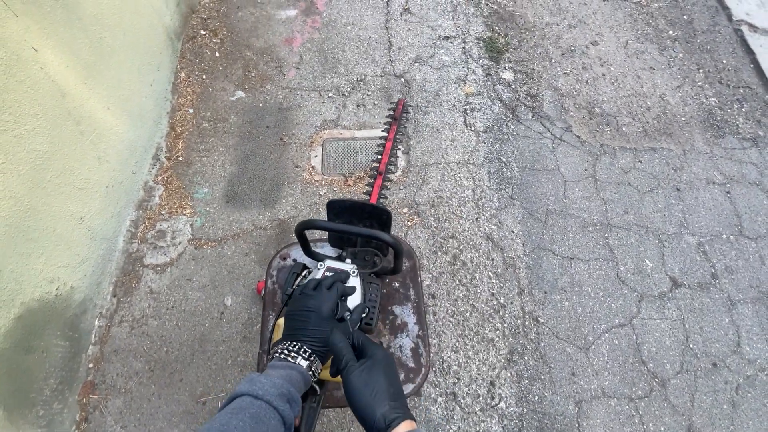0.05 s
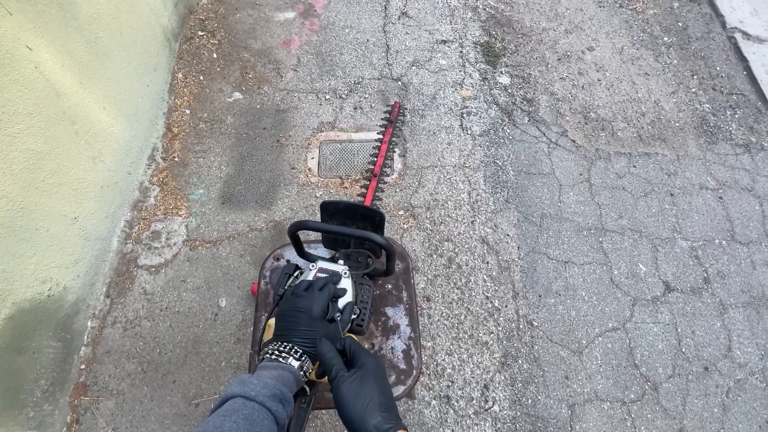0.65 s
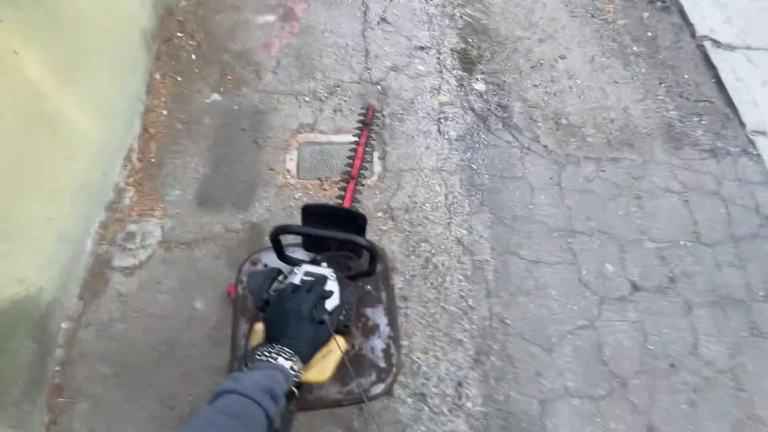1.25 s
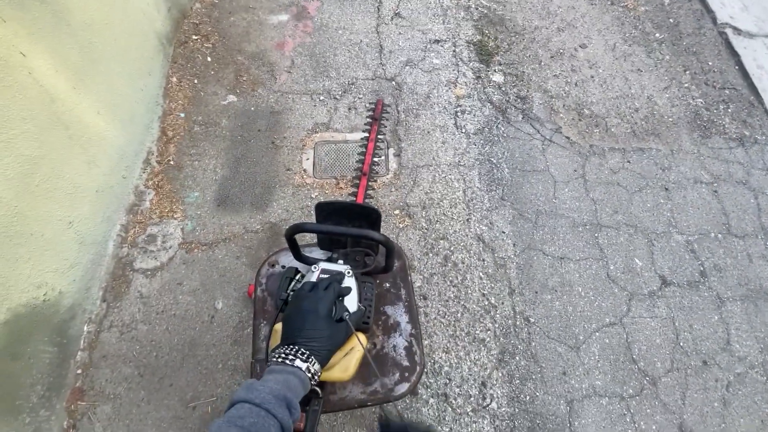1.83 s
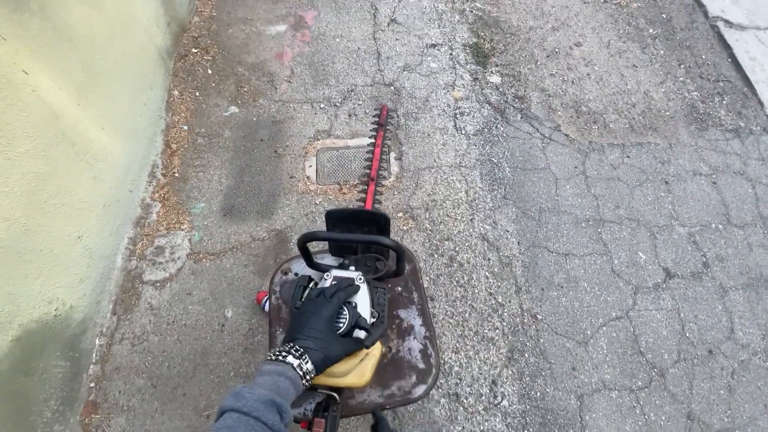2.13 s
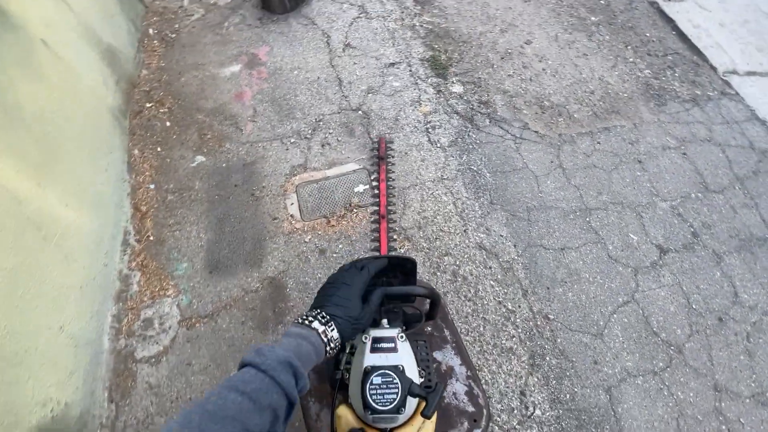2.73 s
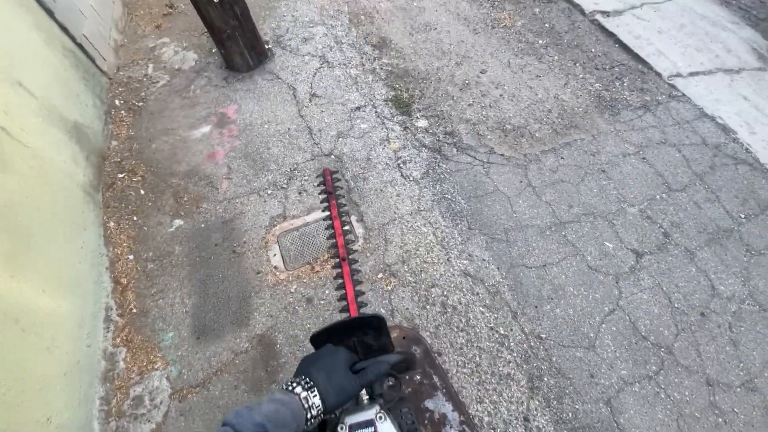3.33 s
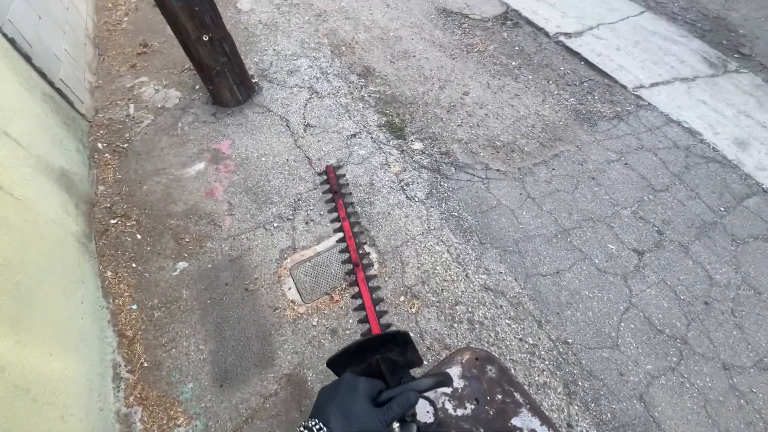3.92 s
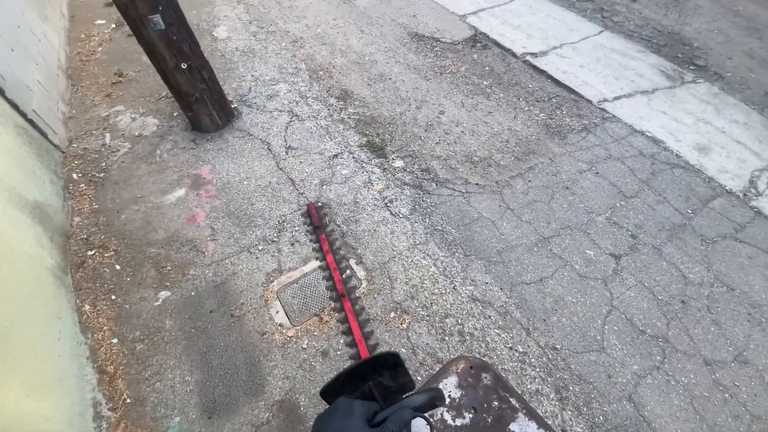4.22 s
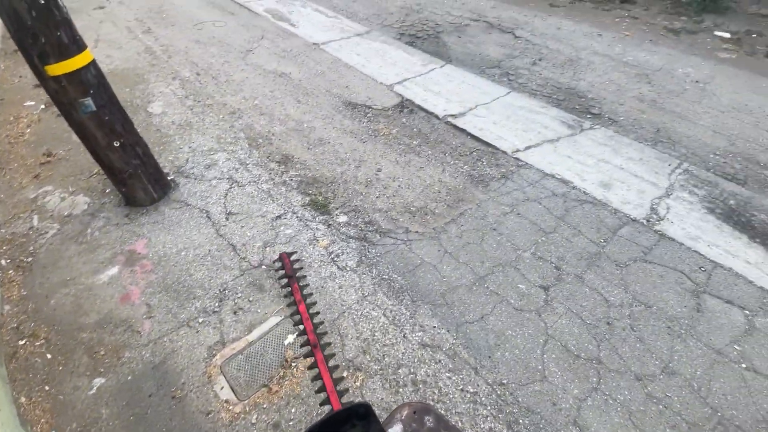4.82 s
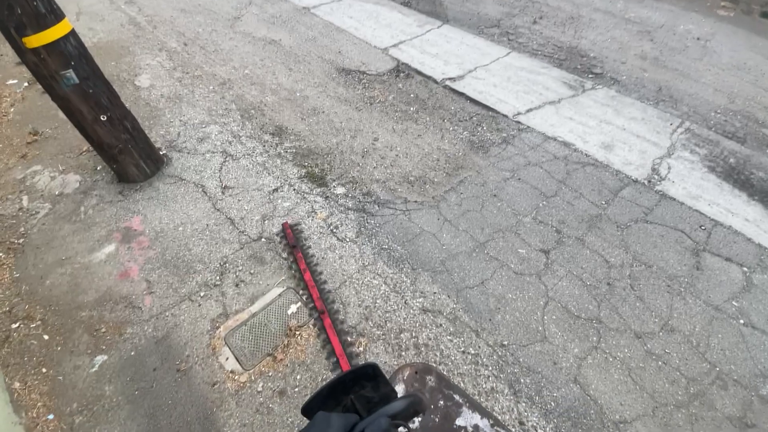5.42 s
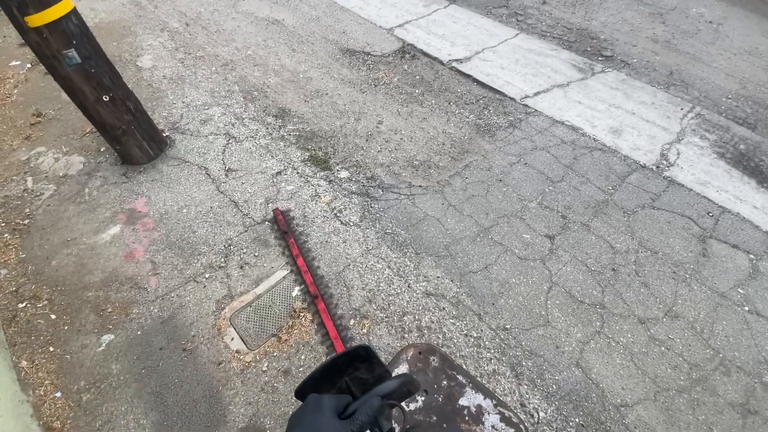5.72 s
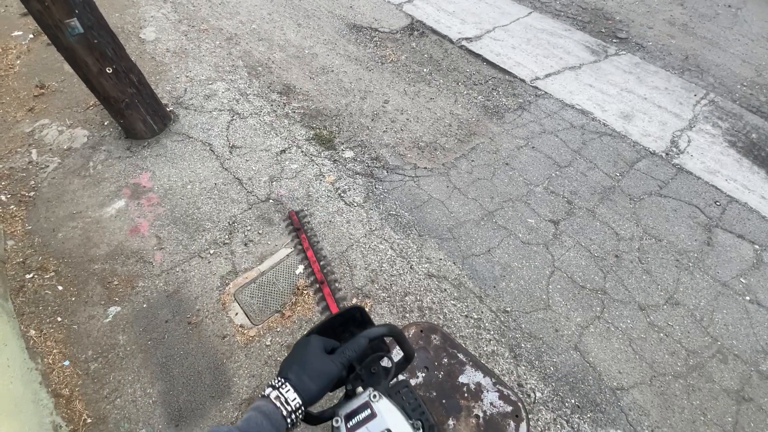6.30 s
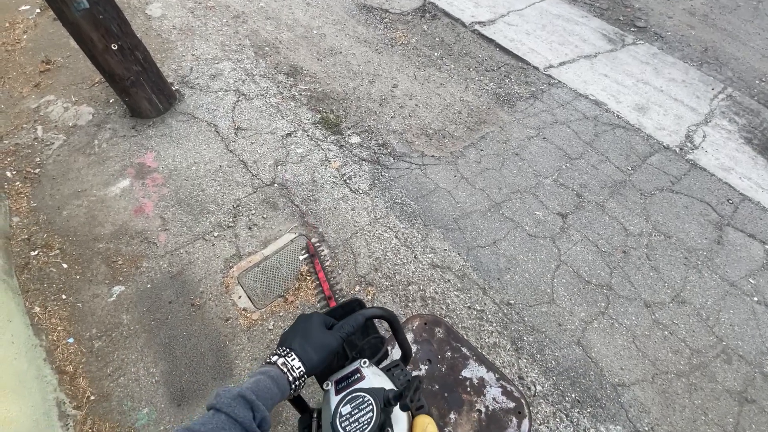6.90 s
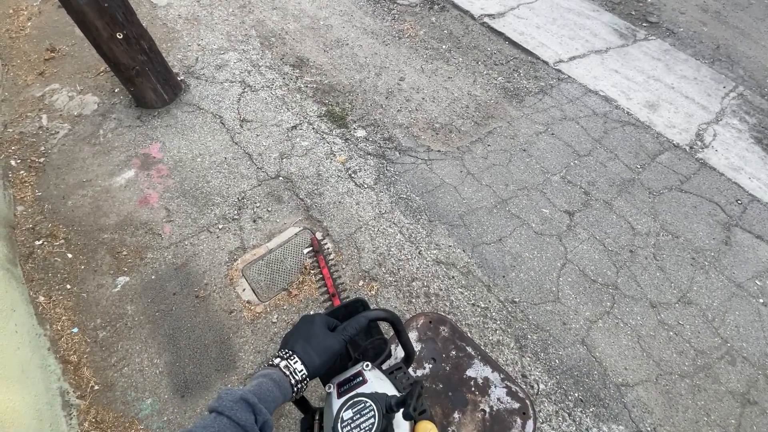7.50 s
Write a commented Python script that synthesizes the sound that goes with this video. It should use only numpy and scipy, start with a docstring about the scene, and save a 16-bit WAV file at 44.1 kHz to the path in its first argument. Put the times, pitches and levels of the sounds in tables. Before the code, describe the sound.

Close by on a paved street, a small petrol hedge trimmer starts with one whirring, clicking pull of its cord. The engine sputters into a ragged, knocking idle. Two quick, loud revs follow, then a brief drop and two longer revs with a raspy drone and metallic blade chatter, each breaking into a coarse burble at high speed. The street itself is only a faint low hum.

```python
"""A two-stroke hedge trimmer is pull-started, catches, putters unevenly and is revved four times.
Near the top of the last two revs it fires hard only every other turn (four-stroking).
The crank times the airbox puffs, muffler drone and bark, housing rasp and blade clatter.
Lone firings knock at idle; the starter cord whirrs, clicks and thuds. A faint street hum lies behind,
and all is heard through two microphone ports with short reflections off pavement and wall."""
import sys
import numpy as np
from scipy import signal
from scipy.fft import rfft, irfft, next_fast_len
from scipy.io import wavfile
from scipy.ndimage import uniform_filter1d, map_coordinates

SR = 44100
rng = np.random.default_rng(int(sys.argv[2]) if len(sys.argv) > 2 else 0)


def store_pcm(level_fs):
    """Save levels as 16-bit WAV."""
    pcm = np.round(np.clip(level_fs, -1, 1) * 32767).astype(np.int16)
    wavfile.write(sys.argv[1], SR, np.atleast_2d(pcm).T)


N = 332955
T = np.arange(N) / SR

# Each row: throttle opens in s, shuts in s, target crank speed in Hz, spin-up time in s.
REVS = [(3.595, 3.928, 144.0, .464), (4.109, 4.546, 143.8, .424), (5.079, 6.377, 153.0, .511),
        (6.625, 7.7, 146.5, .452)]
# Four-stroking. Each row: time in s, weakening of every second firing from 0 to 1.
FOUR_STROKING = [(5.72, 0), (5.77, .6), (6.36, .6), (6.42, 0), (7.07, 0), (7.12, .55), (7.55, .45)]
# The trimmer is swung about. Each row: time in s, then muffler, housing and blade gain in dB.
SWING_GAINS = [(3.4, -1, 1.5, 2), (3.76, 1, 3, 4.5), (4.45, 0, .5, 1.5), (4.9, -4.5, -3, -2.5),
               (5.25, -2, -1, -1), (5.7, -0.5, 1.5, 2.5), (6.0, -3.5, -0.5, 2), (6.25, -3.5, 1.5, -0.5),
               (6.75, -4, 1, -1), (7.55, -4, 1, 0.5)]
# Each row: frequency in Hz, housing response in dB.
HOUSING_BODY = [(850, -48.5), (1150, 9.5), (1280, 15.5), (1450, 17), (1650, 15), (1850, 16.5), (2000, 15.5),
                (2200, 7.5), (2450, -10), (3600, -20)]


def engine(turns, speed_hz):
    """Each turn puffs through the airbox, barks in the muffler, shakes the housing, rattles the blades."""
    # Open throttle. Each row: crank speed in Hz, then puff, bark, rasp and clatter level in dB.
    effort = [(48.3, -26.5, -28, -35.5, -38), (76.4, -27, -23.5, -26, -27.5),
              (108, -26.5, -22.5, -22.5, -24), (115, -31, -21.5, -20.5, -23.5),
              (124, -36, -22.5, -22, -23.5)]
    # Change of those four levels with the throttle shut, in dB.
    shut_db = [-2.5, -12, -5, -2.5]
    # In the first seconds the low band is almost silent, then swells in. Each row: time in s, then offsets of
    # those four levels in dB.
    opening_offsets = [(1.38, -24, -13, -11.5, -3.5), (1.86, -66, -15, -7, -4), (2.25, -35.5, -5.5, -4, -4),
                       (2.52, -10, 7.5, -3.5, -1), (2.7, 0, 4, 0.5, 1), (3.05, 1.5, 3, -3.5, -2.5)]
    puff_db, bark_db, rasp_db, clatter_db = levels(effort, shut_db, speed_hz) + curves(opening_offsets)
    muffler_db, housing_db, blades_db = curves(SWING_GAINS)
    skip, = curves(FOUR_STROKING)
    rough = sputter(speed_hz)
    count = np.arange(np.ceil(turns[0]), turns[-1])
    turn_s, odd = np.interp(count, turns, T), count % 2
    ragged = np.interp(turn_s, T, rough)
    puff = amp(puff_db + muffler_db) * airbox_puff(turn_s, ragged)
    blow_s = jitter(turn_s, .0004 * ragged)
    slap_s = np.interp(count + .62, turns, T)
    sizes = (1 - odd * np.interp(turn_s, T, skip)) * scatter(turn_s, 1 + 1.2 * ragged)
    # Sputter and weak firings turn clean harmonics into rushing gas.
    gas_share = np.clip(.27 + .62 * rough + .3 * skip, 0, 1)
    bark = amp(bark_db + muffler_db) * muffler_bark(blow_s, sizes, gas_share)
    rasp = amp(rasp_db + housing_db) * housing_rasp(blow_s, slap_s, sizes, gas_share)
    clatter = amp(clatter_db + blades_db) * blade_clatter(turns, turn_s, odd, ragged)
    air = amp(clatter_db - 15.5) * cooling_fan()
    running = np.interp(T, [1.3, 1.4], [0, 1])
    return running * (puff + bark + rasp + clatter + air)


def airbox_puff(turn_s, ragged):
    """Each stroke rings the airbox with a pulse and a breath of noise."""
    # Each row: frequency in Hz, response in dB.
    airbox = [(25, -92), (60, -32), (110, -15), (150, -12), (200, 7.5), (270, 1.5), (350, -4.5), (430, 1.5),
              (520, -17), (750, -49.5)]
    stroke_s = jitter(turn_s, .0007 * ragged)
    tone = ring(pulses(stroke_s, scatter(turn_s, 1 + 1.02 * ragged)), airbox)
    breath = ring(bursts(stroke_s, scatter(turn_s, spread_db=2.5), t60_s=.02, rise_s=.002), airbox)
    return steady(steady(tone) + .3 * steady(breath))


def muffler_bark(blow_s, sizes, gas_share):
    """The exhaust port opens just after each blow and vents into the muffler."""
    # Each row: frequency in Hz, response in dB.
    muffler = [(330, -82), (480, 0), (560, -11), (650, 2.5), (730, 13.5), (800, 5.5), (900, 10.5),
               (1020, 4), (1150, 3), (1500, -42)]
    vent_s, strength = blow_s + .0028, sizes ** .6
    tone = ring(pulses(vent_s, strength), muffler)
    gas = ring(bursts(vent_s, strength, t60_s=.06, rise_s=.001), muffler)
    return blend(tone, gas, .85 * gas_share ** 1.7)


def muffler_drone(turns, speed_hz):
    """Crank orders 1-3 from the first rev on, plus half orders while four-stroking."""
    # Open throttle. Each row: crank speed in Hz, then level of orders 1, 2 and 3 in dB.
    orders = [(52, -45, -48, -24.5), (71.7, -40, -39, -25.5), (84.5, -48, -28.5, -25.5),
              (104, -43, -49, -23), (110, -29, -42, -24.5), (123.3, -26, -31.5, -22),
              (131.6, -24.5, -26, -23.5)]
    # Change of those three levels with the throttle shut, in dB.
    shut_db = [-12, 2, -40]
    # Each row: crank order, level in dB re order 2 at full four-stroking.
    half_orders = [(.5, -18), (1.5, -1), (2.5, -11), (3.5, -8), (4.5, -20)]
    first_db, second_db, third_db = levels(orders, shut_db, speed_hz)
    muffler_db, _, _ = curves(SWING_GAINS)
    skip, = curves(FOUR_STROKING)
    rough = sputter(speed_hz)
    order = lambda k: np.sqrt(2) * np.cos(2 * np.pi * k * turns + .2 * rough * wobble(60))
    tone = sum(amp(db + (.5 + 1.5 * rough) * wobble(45)) * order(k)
               for k, db in enumerate([first_db, second_db, third_db + muffler_db], 1))
    halves = sum(amp(db + .8 * wobble(14)) * order(k) for k, db in half_orders)
    return (tone + skip * amp(second_db) * halves) * np.interp(T, [3.57, 3.62], [0, 1])


def housing_rasp(blow_s, slap_s, sizes, gas_share):
    """Each blow shakes the housing; the piston slaps it again later in the turn."""
    tone = ring(pulses(blow_s, sizes) + .55 * pulses(slap_s, sizes), HOUSING_BODY)
    gas = ring(bursts(blow_s, sizes, t60_s=.06, rise_s=.001), HOUSING_BODY)
    gas = filtered(gas, lambda hz: 1 / (1 + ((hz - 1520) / 300) ** 2))
    return blend(tone, gas, gas_share ** .9)


def blade_clatter(turns, turn_s, odd, ragged):
    """The geared blades reverse every second turn; loose parts chatter in between."""
    clack_s = jitter(turn_s, .001 * ragged)
    sizes = (1 - .55 * odd) * scatter(turn_s, spread_db=2.5)
    clacks = bursts(clack_s, sizes, t60_s=.02, rise_s=.0008)
    loose_s = np.interp(rng.uniform(0, turns[-1], 3 * len(turn_s)), turns, T)
    chatter = bursts(loose_s, scatter(loose_s, spread_db=4), t60_s=.008)
    drive = steady(clacks) + .8 * steady(chatter) + .6 * rng.standard_normal(N)
    return steady(blade_steel(drive, ring_db=-2))


def blade_steel(x, ring_db):
    """Struck blades and gear case: a broad clash with a few short modes."""
    # Each row: frequency in Hz, response in dB.
    clash = [(1500, -77), (2300, -1), (2700, -0.5), (3300, 1.5), (4000, -2), (4800, -6), (5400, -1),
             (6200, -1), (7300, -4), (8600, -4.5), (10700, -10.5), (12500, -16.5), (15500, -16)]
    # Each row: mode frequency in Hz, width in Hz, gain in dB.
    steel = [(3040, 37, -11), (5915, 180, -5.5), (6560, 290, -7), (8140, 1300, -19), (11060, 750, -7)]
    modes = lambda hz: sum(amp(db) * 1j * hz * width / (centre ** 2 - hz ** 2 + 1j * hz * width)
                           for centre, width, db in steel)
    return filtered(ring(x, clash), lambda hz: 1 + amp(ring_db) * modes(hz))


def cooling_fan():
    """Air rushing from the flywheel."""
    # Each row: frequency in Hz, relative level in dB.
    spectrum = [(25, -17), (70, 5.5), (130, 6.5), (180, -3), (225, -41), (300, 11.5), (400, 3), (500, -6),
                (900, -63)]
    return ring(rng.standard_normal(N), spectrum)


def lone_firings():
    """Single combustions knock in the muffler and snap the blade drive."""
    # Each row: frequency in Hz, muffler response in dB.
    pop = [(180, -66), (350, -45), (460, -2), (550, -10.5), (690, 5), (850, -19), (1100, -21), (1300, 6),
           (1480, 6), (1800, -7.5), (2200, -11.5), (2700, -13.5), (5000, -47)]
    start_s, db, tick_db = firing_schedule()
    peak_s, sizes = start_s + .001526, amp(db) * scatter(start_s, spread_db=3.6)
    knock = 4.2 * pulses(peak_s, sizes) + .12 * bursts(peak_s, sizes, t60_s=.035, rise_s=.0018)
    snap = bursts(peak_s, sizes * amp(tick_db - 1.5), t60_s=.011, rise_s=.0007)
    return amp(4) * ring(knock, pop) + blade_steel(snap, ring_db=5)


def firing_schedule():
    """Time, level and tick offset of each lone firing."""
    # Evenly spaced runs. Each row: first in s, last in s, count, relative level in dB, tick offset in dB.
    runs = [(1.488, 1.732, 6, -36.5, -3.5), (1.782, 1.873, 3, -27, -6), (1.967, 1.967, 1, -17.5, -6.5),
            (2.027, 2.027, 1, -28.5, -1.5), (2.094, 2.285, 4, -19, -5.5), (2.343, 2.402, 2, -19.5, -3),
            (2.463, 2.501, 2, -24.5, -6), (2.658, 2.716, 2, -21.5, -3.5), (2.756, 2.933, 4, -22.5, -6.5),
            (3.032, 3.271, 5, -23, -4.5), (3.327, 3.5, 4, -23.5, -0.5), (4.982, 4.982, 1, -22.5, -5.5),
            (5.049, 5.1, 2, -24.5, -1.5)]
    return np.transpose([(s, db, tick_db) for first, last, count, db, tick_db in runs
                         for s in np.linspace(first, last, round(count))])


def crank_speed():
    """Speed in Hz: each squeeze spins the engine up against drag, then it coasts down."""
    # Start and idle. Each row: time in s, crank speed in Hz.
    idle = [(1.05, 36), (1.5, 41), (1.87, 44), (2.1, 46.5), (2.35, 50.5), (3.55, 51)]
    sag_hz_per_s, coast_hz, coast_s = 17.94, 25.32, .432
    speed_hz, = curves(idle)
    for open_s, shut_s, target_hz, spin_s in REVS:
        start = np.arctanh(min(np.interp(open_s, T, speed_hz) / target_hz, .99))
        held_s = np.clip(T, open_s, shut_s) - open_s
        climb_hz = target_hz * np.tanh(start + held_s / spin_s) - sag_hz_per_s * held_s
        decay = np.exp(-np.maximum(T - shut_s, 0) / coast_s)
        speed_hz = np.where(T > open_s, coast_hz + (climb_hz - coast_hz) * decay, speed_hz)
    return speed_hz


def crank_angle(speed_hz):
    """Angle in turns, nudged so that each lone firing falls on a whole turn."""
    turns = np.cumsum(speed_hz * (1 + .0015 * wobble(20))) / SR
    fired_s = firing_schedule()[0]
    at = np.interp(fired_s, T, turns)
    whole = np.round(at[0]) + np.cumsum(np.round(np.diff(at, prepend=at[0])))
    return turns + np.interp(T, fired_s, whole - at)


def throttle():
    """Engine pull, 0-1: it builds just ahead of each rev and lingers after it."""
    lead_s, build_s, linger_s, fade_s = .017, .055, .011, .089
    rise = lambda open_s: .5 + (T - open_s + lead_s) / build_s
    fall = lambda shut_s: .5 - (T - shut_s - linger_s) / fade_s
    return sum(np.clip(np.minimum(rise(open_s), fall(shut_s)), 0, 1) for open_s, shut_s, _, _ in REVS)


def sputter(speed_hz):
    """Raggedness, 0-1: even when pulling hard, rough at idle or while slowing."""
    return np.maximum(1 - throttle(), np.interp(speed_hz, [55, 85], [1, 0]))


def levels(table, shut_db, speed_hz):
    """Each layer's dB at the crank speed, offset while the throttle is shut."""
    speeds, *cols = np.transpose(table)
    shut = 1 - throttle()
    return np.array([np.interp(speed_hz, speeds, col) + db * shut for col, db in zip(cols, shut_db)])


def recoil_starter():
    """The cord whirrs on its reel, the pawls click and compression thuds in the crankcase."""
    # Each row: time in s, relative level in dB.
    cord = [(0.8, -104), (0.9, -62.5), (0.922, -53), (1.05, -43.5), (1.072, -41.5), (1.112, -31.5),
            (1.354, -37), (1.42, -49), (1.8, -74)]
    pawls = [(0.9247, -39), (1.043, -50), (1.1411, -10), (1.302, -29.5)]
    compressions = [(0.947, -35), (0.973, -32.5), (1.018, -30), (1.039, -23), (1.046, -34)]
    # Each row: frequency in Hz, response in dB.
    reel = [(25, -54), (80, -3), (170, -10), (290, -0.5), (500, -14.5), (800, -3), (1100, -6), (1450, 0),
            (2200, -12), (3200, -8), (4600, -10), (5700, -7), (7500, -14), (10500, -17.5), (15500, -28)]
    crankcase = [(40, -48), (110, -7), (210, 5), (330, -14), (450, -1), (600, -13), (860, -5), (1100, -17),
                 (1450, -6), (3000, -43)]
    cord_db, = curves(cord)
    whirr = amp(cord_db + 2.9 * wobble(130)) * ring(rng.standard_normal(N), reel)
    click_s, click_db = np.transpose(pawls)
    snap = bursts(click_s + .00091, amp(click_db), t60_s=.017, rise_s=.001)
    clicks = amp(-3) * blade_steel(snap, ring_db=4) + amp(-13) * ring(snap, HOUSING_BODY)
    thud_s, thud_db = np.transpose(compressions)
    thuds = 5 * pulses(thud_s, amp(thud_db)) + .24 * bursts(thud_s, amp(thud_db), t60_s=.1, rise_s=.0011)
    return whirr + clicks + ring(thuds, crankcase)


def street_hum():
    """Faint, low, wavering noise."""
    # Each row: frequency in Hz, relative level in dB.
    spectrum = [(24, -66), (40, -19), (234, -9), (264, -7), (539, -23), (809, -14.5), (1160, -16),
                (1300, -13), (2430, -28.5), (12000, -61), (15600, -80), (22000, -120)]
    level_db = np.interp(T, [0, .7], [-66, -71]) + .57 * wobble(12.2)
    return amp(level_db) * ring(rng.standard_normal(N), spectrum)


def reflections(x, t60_s, size=2048, count=12):
    """Pavement and wall scatter a short tail, unlike at each ear, that shifts as the head moves."""
    tails = rng.standard_normal((count, 2, size)) * amp(-60 * T[:size] / t60_s) * (T[:size] > .002)
    place = T / T[-1] * (count - 1)
    near = lambda k: np.sqrt(np.maximum(1 - np.abs(place - k), 0))
    wet = sum(signal.oaconvolve((x * near(k))[None], tail / np.linalg.norm(tail[0]), axes=1)[:, :N]
              for k, tail in enumerate(tails))
    return filtered(wet, lambda hz: hz ** 2 / (hz ** 2 + 450 ** 2))


def microphone_ports(hz):
    """Left and right response; the left port is muffled in the mid treble."""
    # Each row: frequency in Hz, left minus right in dB, left phase lead in radians.
    balance = [(130, -3, -.5), (300, 0, -.6), (430, 0, -1.1), (650, -11, -3.1), (800, -9, -1.5),
               (1020, -3, -2.5), (1350, -1, -6.5), (2100, -8, -6.9), (2800, -8, -9.5), (3700, -11, -11.6),
               (4400, -27, -11.9), (5000, -16, -14.5), (5600, -27, -14.3), (6300, -18, -12.1),
               (8600, -18, -6.3), (9850, -1, -3.2), (10800, 0, 0), (12700, 0, 3.1), (14700, 0, 6.3)]
    ratio, lead_rad = amp(along(balance, hz)), along(balance, hz, column=2)
    return np.array([ratio * np.exp(1j * lead_rad), np.ones_like(ratio)]) * np.sqrt(2 / (1 + ratio ** 2))


def amp(db):
    """Decibels to gain."""
    return 10 ** (np.asarray(db) / 20)


def along(rows, hz, column=1):
    """One column read on a log-frequency axis."""
    table = np.transpose(rows)
    return np.interp(np.log(hz + 1), np.log(table[0] + 1), table[column])


def curves(rows):
    """One value per sample for each column after the time."""
    time_s, *cols = np.transpose(rows)
    return [np.interp(T, time_s, col) for col in cols]


def wobble(knots_per_s):
    """A smooth random curve."""
    return map_coordinates(rng.standard_normal(int(N * knots_per_s / SR) + 4), [T * knots_per_s])


def filtered(x, response):
    """x through a complex frequency response."""
    size = next_fast_len(N + SR // 2)
    return irfft(rfft(x, size) * response(np.fft.rfftfreq(size, 1 / SR)), size)[..., :N]


def ring(x, colour, size=4096):
    """x through a minimum-phase, unit-energy body of the given colour."""
    cepstrum = irfft(np.log(amp(along(colour, np.fft.rfftfreq(size, 1 / SR)))))
    cepstrum[1:size // 2] *= 2
    cepstrum[size // 2 + 1:] = 0
    response = irfft(np.exp(rfft(cepstrum)))
    return signal.fftconvolve(x, response / np.linalg.norm(response))[:N]


def steady(x, size=3500):
    """x held at rms 1 over a few crank turns."""
    power = uniform_filter1d(uniform_filter1d(x ** 2, size), size)
    return x / np.sqrt(np.abs(power) + np.mean(x ** 2) / 1000)


def blend(tone, gas, gas_share):
    """Equal-power mix."""
    return np.sqrt(1 - gas_share) * steady(tone) + np.sqrt(gas_share) * steady(gas)


def pulses(times_s, sizes):
    """Impulses placed between samples."""
    at = np.clip(times_s * SR, 0, N - 2)
    i = at.astype(int)
    return np.bincount(i, sizes * (1 - at + i), N) + np.bincount(i + 1, sizes * (at - i), N)


def bursts(times_s, sizes, t60_s, rise_s=.00033):
    """Noise that swells up to each time and dies away after it."""
    lead = SR // 100
    t = T[:SR // 8] - T[lead]
    shape = np.exp(np.minimum(t, 0) / rise_s) * amp(-60 * np.maximum(t, 0) / t60_s)
    return signal.fftconvolve(pulses(times_s, sizes), shape)[lead:lead + N] * rng.standard_normal(N)


def scatter(times_s, spread_db):
    """A random size for each blow."""
    return amp(spread_db * rng.standard_normal(len(times_s)))


def jitter(times_s, spread_s):
    """Each time shifted at random."""
    return times_s + spread_s * rng.standard_normal(len(times_s))


def scene():
    """The trimmer over the street hum, heard through both ports."""
    speed_hz = crank_speed()
    turns = crank_angle(speed_hz)
    machine = engine(turns, speed_hz) + lone_firings() + recoil_starter()
    street = street_hum()
    reflected = amp(-6) * reflections(machine + street, t60_s=.06)
    return filtered(muffler_drone(turns, speed_hz) + machine + street + reflected, microphone_ports)


def record(dry):
    """A steep low-pass."""
    cutoff_hz, edge_hz = 15900, 300
    return filtered(dry, lambda hz: np.clip((cutoff_hz - hz) / edge_hz + .5, 0, 1))


dry = scene()
out = record(dry)
store_pcm(out)
```